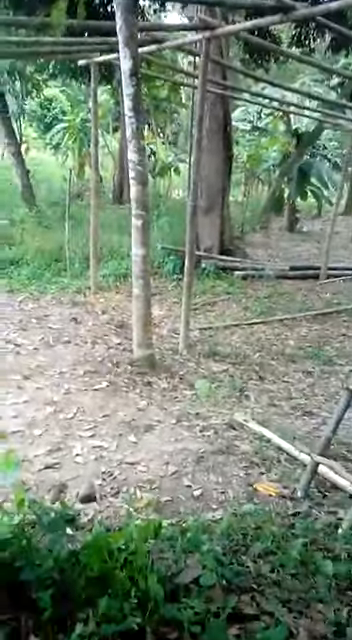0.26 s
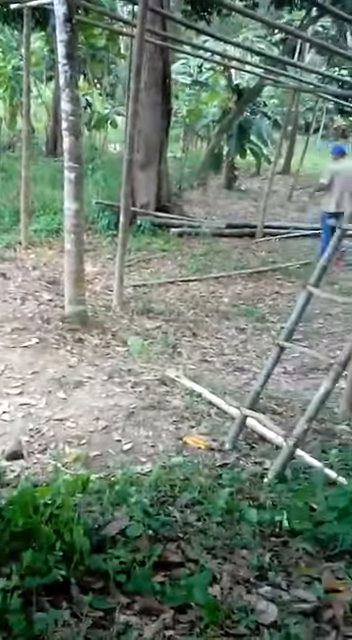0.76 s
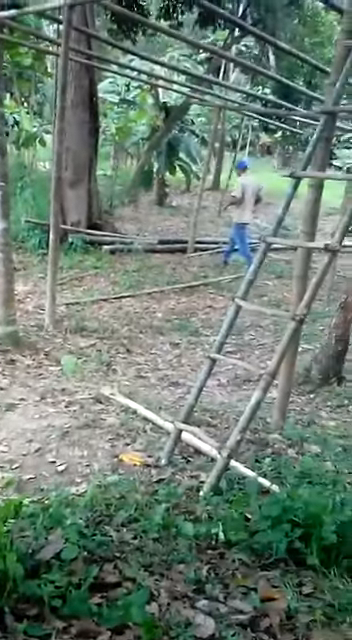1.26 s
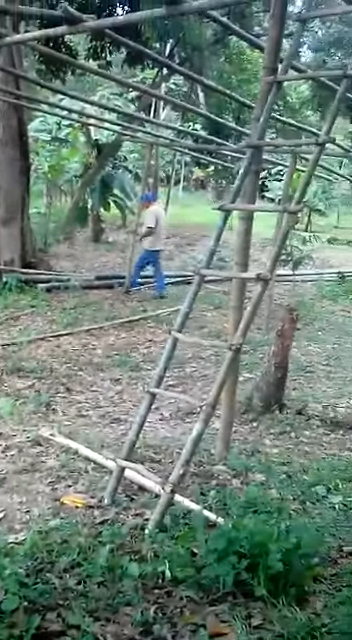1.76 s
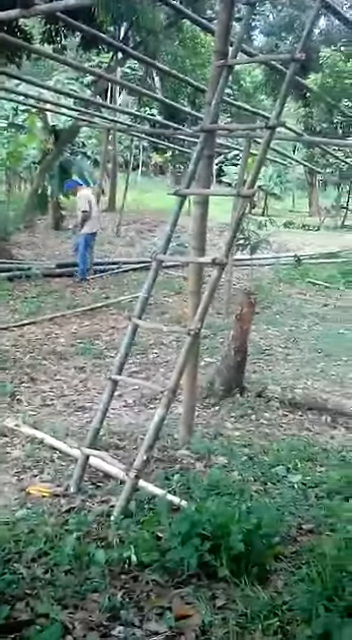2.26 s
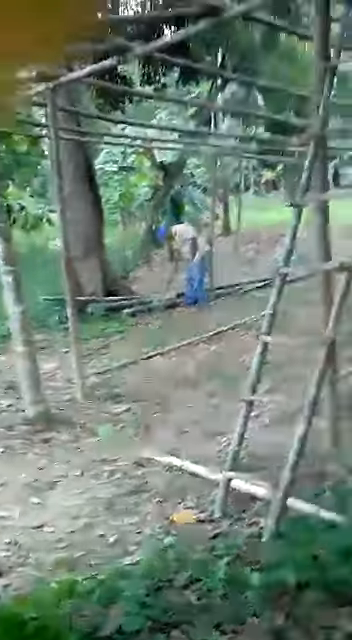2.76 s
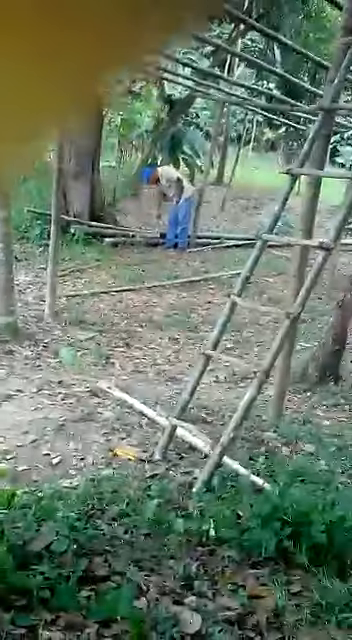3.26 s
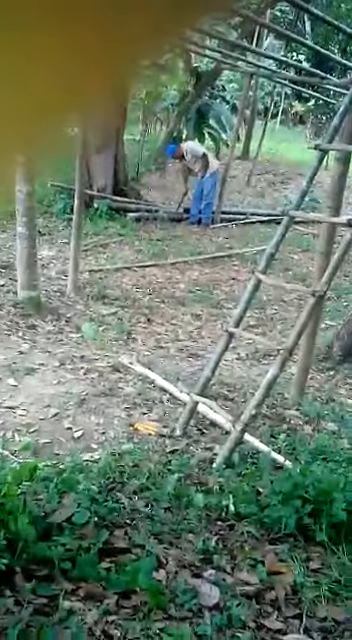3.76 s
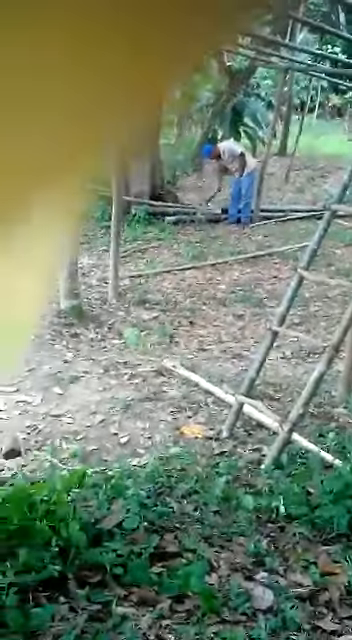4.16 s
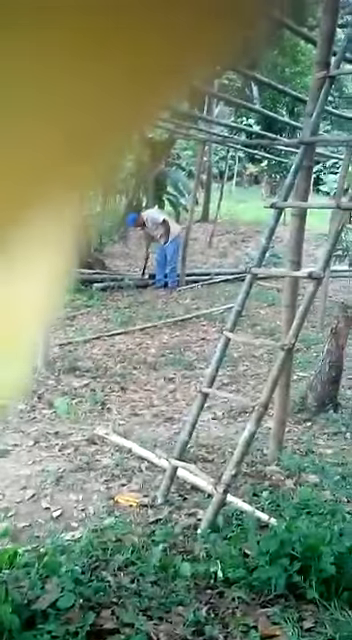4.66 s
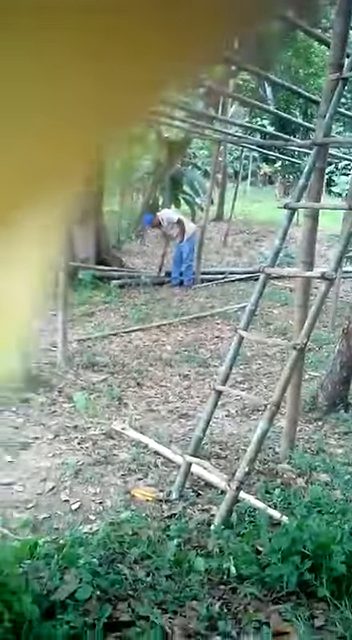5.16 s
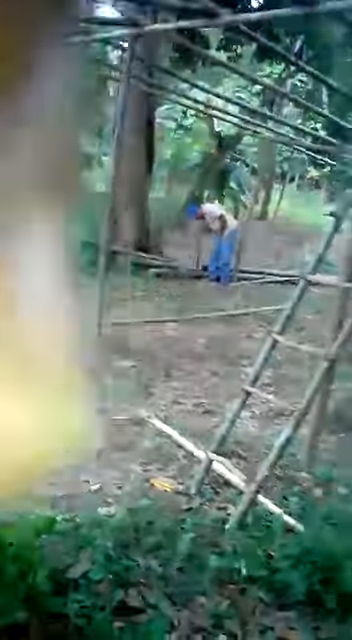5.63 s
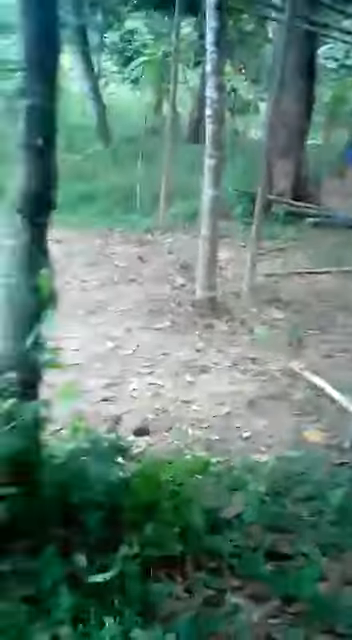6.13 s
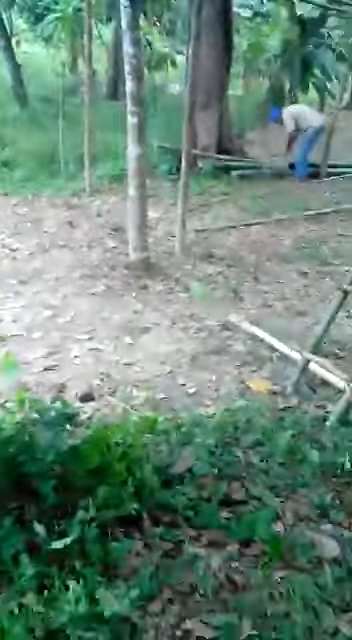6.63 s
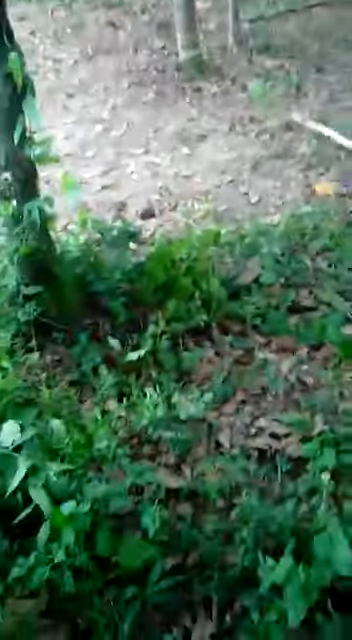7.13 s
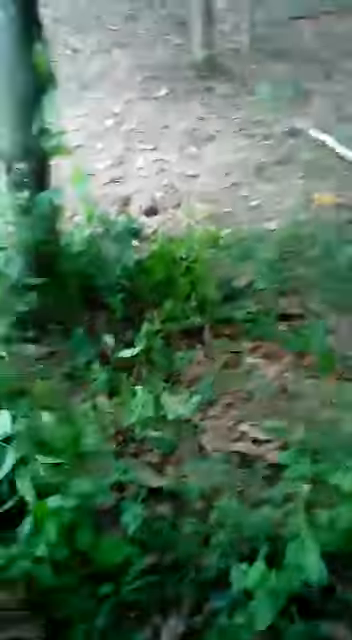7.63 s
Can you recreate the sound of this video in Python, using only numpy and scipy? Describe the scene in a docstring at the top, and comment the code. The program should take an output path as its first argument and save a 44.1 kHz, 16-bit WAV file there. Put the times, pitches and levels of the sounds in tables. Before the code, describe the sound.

A quiet outdoor grove with faint rustle and thin sliding insect-like hisses. Fingers knock and rub the phone case right at the microphone, mostly left, in a cluster near three seconds, then loudly and busily from five and a half seconds to the end. Between them a blade chops hollow poles some way off, dry twigs snap sharply nearby, and small birds chirp and sing.

```python
"""Hands on a phone in a grove

Fingers tap, slip and rub on the case of a hand-held phone, mostly at the left microphone: damped modes and
grainy noise. Twigs and dry leaves snap nearby as short modal bursts; a blade chops hollow poles further off,
as decaying bands of noise with a falling ring. Small birds chirp in the trees as gliding sines, over a quiet
floor of rustle in noise bands and narrow hisses that slide in pitch, perhaps far insects."""
import sys
import numpy as np
from scipy import signal
from scipy.fft import rfft, irfft
from scipy.io import wavfile
from scipy.ndimage import uniform_filter1d

SR = 44100
rng = np.random.default_rng(int(sys.argv[2]) if len(sys.argv) > 2 else 0)


def dump_mix(stems):
    """Bounce the given channels to the path in sys.argv[1] as a 16-bit WAV at rate SR."""
    frames = np.atleast_2d(stems).T  # one column per channel
    limited = np.clip(frames, -1, 1)  # hard clip at full scale
    pcm = np.round(limited * 32767).astype(np.int16)
    wavfile.write(sys.argv[1], SR, pcm)


N = 347949      # length in samples


def amp(db):
    """Decibel law: the amplitude gain of a level in dB."""
    return 10 ** (np.asarray(db) / 20)


def rms_one(x):
    """Normalisation: scales a signal to rms 1."""
    return x / np.sqrt(np.mean(x ** 2) + 1e-20)


def at_hz(points, hz):
    """Interpolation on a logarithmic frequency axis."""
    table = np.array(points)
    return np.interp(np.log(hz), np.log(table[:, 0]), table[:, 1])


def spectrum_hz():
    """Discrete spectrum: the bin frequencies of the whole scene, held above 10 Hz for the logarithm."""
    return np.maximum(np.arange(N // 2 + 1) * SR / N, 10)


def pan(left_right_db):
    """Level difference between channels: positive is left, and the nearer side keeps its level."""
    return amp(np.array([np.minimum(left_right_db, 0), np.minimum(-left_right_db, 0)]))


def drift(corner_hz):
    """Low-pass random process: noise through two equal poles, scaled to a spread of 1."""
    step = 20      # samples between computed points
    pole = np.exp(-2 * np.pi * corner_hz * step / SR)
    noise = rng.standard_normal(N // step + 2002)
    slow = signal.lfilter([1], [1, -2 * pole, pole * pole], noise)[2000:]      # skip the settling
    return np.interp(np.arange(N) / step, np.arange(len(slow)), rms_one(slow))


def coloured(x, spectrum):
    """Spectral shaping: weights the spectrum of a noise by a table."""
    return rms_one(irfft(rfft(x) * amp(at_hz(spectrum, spectrum_hz())), N))


def decay(t, t60):
    """Exponential decay: the envelope falls 60 dB in t60 seconds."""
    return amp(-60 * t / t60)


def damped(t, hz, t60):
    """Damped resonance: one mode struck at time zero."""
    return np.sin(2 * np.pi * hz * t) * decay(t, t60)


def swept(hz):
    """Phase accumulation: a sine that follows a frequency curve."""
    return np.sin(2 * np.pi * np.cumsum(hz) / SR)


def add(out, s, sound):
    """Superposition: mixes a sound in at a time."""
    i = round(s * SR)
    out[..., i:i + sound.shape[-1]] += sound[..., :N - i]


def trees(x, wet_db):
    """Scattering by trunks and leaves: convolution with a separate noise tail in each channel."""
    t = np.arange(SR) / SR
    tail = rng.standard_normal((2, SR)) * decay(t, .42) * (1 - np.exp(-t / 0.018))
    tail = rms_one(tail) / np.sqrt(SR)      # unit energy
    return amp(wet_db) * signal.fftconvolve(x[None], tail, axes=1)[:, :N]


# Spectrum of the rustle. Each row: frequency in Hz, left and right relative levels in dB per Hz.
GROVE_SPECTRUM = [(25, -87, -93.5), (54.6, -75.5, -84), (97.8, -85.5, -77.5), (203.4, -89, -84),
                  (431, -95, -88.5), (900, -96, -90.5), (1980, -99.1, -97.5), (2920, -99, -103.5),
                  (3630, -95.5, -100.2), (4400, -96.5, -103.6), (5300, -99.4, -107.6), (6600, -98, -101.6),
                  (7700, -101.7, -113.6), (8860, -116.8, -130.9)]
# Correlation of the channels. Each row: frequency in Hz, left-right likeness from -1 to 1.
LIKENESS = [(60, 1), (210, 0.6), (700, 0.47), (2400, 0.11), (8190, -0.45)]
# Leaves stirred in the air. Each row: start in seconds, length in seconds, peak treble level in dB over the rustle.
SWISHES = [(0.733, .14, 15), (1.709, 0.054, 3), (2.1, 0.12, 5), (2.334, 0.047, 4), (2.693, 0.067, 8)]
GROVE_DB = -55      # rms over both channels


def grove():
    """Partly correlated noise: half-octave bands, each with its own left-right likeness and flicker."""
    swish_db = np.zeros(N)
    for s, length, over_db in SWISHES:
        add(swish_db, s, over_db * np.hanning(round(length * SR)))
    out = np.zeros((2, N))
    together = drift(0.9)
    white = rng.standard_normal((2, 2, N))      # neighbouring bands use different noises
    edges = 15 * 2 ** (np.arange(20) / 2)
    for k, (low, high) in enumerate(zip(edges, edges[1:])):
        band = signal.butter(2, [low, high], "band", fs=SR, output="sos")
        mid, side = signal.sosfilt(band, white[k % 2])
        alike = np.clip(at_hz(LIKENESS, np.sqrt(low * high)), -1, 1)
        stereo = np.sqrt(1 + alike) * mid + np.sqrt(1 - alike) * side * [[1], [-1]]
        treble = np.clip(np.log2(low / 900) / 2, 0, 1)      # leaves swish in the treble
        out += amp(.5 * together + 2.1 * drift(4.9) + treble * swish_db) * stereo
    # each microphone has its own colour
    colour = [at_hz(np.array(GROVE_SPECTRUM)[:, [0, side]], spectrum_hz()) for side in (1, 2)]
    return amp(GROVE_DB) * rms_one(irfft(rfft(out) * amp(colour), N))


# Sliding hisses, perhaps far insects. Each row: start in seconds, length in seconds, start frequency in Hz,
# end frequency in Hz, nominal bandwidth in Hz, relative level in dB.
SLIDES = [(0, 0.31, 4140, 4120, 687, -60), (1.13, 0.23, 5280, 3900, 700, -58),
          (1.402, .4, 4000, 3890, 897, -60.5), (1.754, 0.16, 4730, 5360, 1410, -57),
          (2.031, 0.41, 7460, 4550, 594, -53.5), (2.268, .2, 7000, 6260, 815, -56),
          (2.541, .12, 4600, 5600, 900, -48.5), (2.95, 0.98, 6400, 6450, 249, -59),
          (3.8, .85, 6600, 6110, 253.5, -59), (4.77, 0.27, 5200, 3740, 449, -48.5),
          (5.06, 0.24, 6300, 6200, 252, -59.5), (5.79, 0.35, 6700, 4440, 503, -53.5)]
SLIDE_EDGE, SLIDE_PAN_DB = 0.32, 12.5      # share of the length spent fading; left over right


def sliding_hiss():
    """Amplitude modulation: slow noise on a gliding carrier makes a moving band, heard in patches."""
    out = np.zeros((2, N))
    for s, length, start_hz, end_hz, width_hz, level_db in SLIDES:
        hz = np.geomspace(start_hz, end_hz, round(length * SR))
        clock = np.arange(len(hz)) * 2 * width_hz / SR      # a wider band flickers faster
        points = rng.standard_normal((2, 2000))
        noise = np.array([np.interp(clock, np.arange(len(side)), side) for side in points])
        fade = signal.windows.tukey(len(hz), SLIDE_EDGE)
        add(out, s, amp(level_db) * fade * noise * swept(hz))
    patches = amp(2.5 * drift(14))
    return patches * out * pan(np.array([SLIDE_PAN_DB]))


# Single notes, mostly rising. Each row: start in seconds, length in seconds, start frequency in Hz,
# end frequency in Hz, relative level in dB.
SINGLE_NOTES = [(1.02, 0.029, 1170, 1145, -55), (1.125, .027, 3270, 2830, -58.5),
                (3.1, 0.14, 7100, 6500, -54), (3.15, 0.026, 6450, 6370, -54),
                (4.95, 0.037, 6900, 5900, -52), (6.235, 0.016, 3390, 4250, -42),
                (6.605, .02, 3380, 4300, -54), (6.675, 0.018, 3400, 4120, -49),
                (6.94, 0.04, 3470, 3750, -52), (6.97, 0.032, 3770, 4400, -51.5),
                (7.35, 0.033, 3580, 5070, -60), (7.37, 0.02, 3700, 3500, -55),
                (7.422, 0.028, 3500, 5350, -48), (7.61, .015, 3180, 4260, -58),
                (7.65, 0.033, 3370, 3900, -53), (7.695, 0.021, 3360, 4600, -53),
                (7.87, 0.029, 3460, 3800, -46)]
# One quick falling note of the trill. Each row: as for single notes, with the start counted from the call.
TRILL_NOTE = [(0, .015, 4080, 3480, -54)]
TRILL_S, TRILL_GAP_S = 4.83, .071
# A chip and a falling tail. Each row: as for the trill, with the level in dB over the call.
PHRASE = [(0, .024, 3444, 3613, 2.5), (.04, .036, 3130, 2310, -6)]
# Repeats of the phrase. Each row: frequency ratio, relative level in dB.
SONG = [(1.06, -48), (.99, -50.5), (1, -47), (1.001, -47.5), (1.001, -45), (1.03, -45.5)]
SONG_S, PHRASE_GAP_S = 5.033, .1465      # start of the song, time between phrase starts
# Another bird's call: up, down, up. Each row: as for the phrase.
ZIGZAG = [(0, 0.022, 4750, 5700, -4.8), (.028, .016, 5690, 4630, -1), (.046, .02, 5300, 6460, 0.5)]
# Its calls. Each row: start in seconds, frequency ratio, relative level in dB.
ZIGZAG_CALLS = [(3.53, 0.96, -47), (4.235, 0.95, -46), (6.468, 1.001, -42.5), (7.149, 1.1, -49)]


def bird_notes():
    """Transposition of patterns: a trill of three notes opens a song of phrases, and another bird zigzags."""
    calls = [(TRILL_NOTE, TRILL_S + k * TRILL_GAP_S, 1, 0) for k in range(3)]
    calls += [(PHRASE, SONG_S + k * PHRASE_GAP_S, ratio, db) for k, (ratio, db) in enumerate(SONG)]
    calls += [(ZIGZAG, s, ratio, db) for s, ratio, db in ZIGZAG_CALLS]
    notes = list(SINGLE_NOTES)
    for call, s, ratio, db in calls:
        for lag, length, start_hz, end_hz, note_db in call:
            notes.append((s + lag, length, ratio * start_hz, ratio * end_hz, db + note_db))
    return notes


def birds():
    """Frequency modulation: gliding whistles with soft ends, scattered among the trees."""
    out = np.zeros(N)
    for s, length, start_hz, end_hz, level_db in bird_notes():
        hz = np.geomspace(start_hz, end_hz, max(round(length * SR), 8))
        hz = hz + 375 * uniform_filter1d(rng.standard_normal(len(hz)), size=60)      # the pitch trembles
        soft = np.sqrt(np.hanning(len(hz)))
        add(out, s, amp(level_db) * soft * swept(hz))
    out = out * amp(3.5 * drift(80) + 2.5 * drift(300) - 4)      # moving leaves break the whistles up
    return out * pan(np.array([2.5])) + trees(out, wet_db=-6)


# Blows on the poles. Each row: time in seconds, relative level in dB, then crack (above 1600 Hz),
# body (above 800 Hz) and bass in dB over it.
CHOPS = [(3.351, -33.5, -10.5, -0.5, 0.5), (3.503, -45.5, -4, -2.5, -5), (4.005, -33.5, -3, 2, 4.5),
         (4.717, -30.5, 0.5, 3.5, -5.5)]
# Bending waves in the pole. Each row: frequency in Hz, bandwidth in Hz, relative level in dB,
# rise time constant in seconds, 60 dB decay time in seconds.
POLE_MODES = [(196, 64, 1, 0.0053, 0.21), (408, 140, -6, 0.0033, 0.089), (637, 130, 0.5, 0.0024, 0.28),
              (1120, 72, -11.5, 0.0019, 0.046), (1360, 250, 4, 0.0028, 0.046),
              (1950, 260, 5, 0.00057, 0.038), (3130, 1700, 5.5, 0.00064, 0.067),
              (4250, 550, 9.5, 0.0026, 0.026), (6500, 1800, 6, 0.0013, 0.028)]
GLIDE_HZ = 1492      # start of the falling ring


def chops():
    """Dispersive bending waves: splintering noise fills broad modes, and a rough ring bends downward."""
    out, t = np.zeros(N), np.arange(round(.3 * SR)) / SR
    for peak_s, level_db, crack_db, body_db, bass_db in CHOPS:
        s = peak_s - .0015      # the blade bites just before the peak
        for hz, width_hz, mode_db, rise, t60 in POLE_MODES:
            mode = rms_one(signal.lfilter(*signal.iirpeak(hz, hz / width_hz, SR), rng.standard_normal(len(t))))
            shape = (1 - np.exp(-t / rise)) ** 2 * decay(t, t60)
            part_db = crack_db if hz > 1600 else body_db if hz > 800 else bass_db
            add(out, s, amp(level_db - 5 + mode_db + part_db) * shape * mode)
        falling_hz = GLIDE_HZ / np.sqrt(1 + t / .022)      # slower, lower waves come last
        rough = 1 + 0.38 * rms_one(uniform_filter1d(rng.standard_normal(len(t)), size=120))
        ring = rough * swept(falling_hz) * (1 - np.exp(-t / 0.0013)) * decay(t, 0.11)
        add(out, s, amp(level_db - 3.5 + body_db) * ring)
    add(out, .032, amp(-14) * uniform_filter1d(out, size=16))      # a dull echo off the nearby trunks
    bright_tail = trees(np.diff(out, prepend=0), wet_db=-2.5)      # differencing favours the treble
    return out * pan(np.array([-1.5])) + bright_tail + trees(out, wet_db=-18.5)


# Dry twigs and leaves, with their rebounds. Each row: time in seconds, relative level in dB,
# left-right difference in dB, main mode in Hz.
SNAPS = [(0.2562, -28.5, 7, 3360), (0.2637, -37, -5, 3340), (0.288, -37, -4, 3200), (3.7154, -20, 11, 4000),
         (3.721, -23, -35, 3770), (3.7276, -26, -22, 3840), (3.7469, -26, 8, 3550),
         (5.3162, -15.5, 21, 3900), (5.3214, -20, -17, 3820), (5.326, -24.5, 18, 3750)]


def snaps():
    """Modal synthesis: millisecond bursts ring in three heavily damped modes."""
    out, t = np.zeros((2, N)), np.arange(round(.02 * SR)) / SR
    for s, level_db, pan_db, hz in SNAPS:
        a, b = rng.uniform(.92, 1.08, 2)      # the outer modes vary from snap to snap
        modes = damped(t, hz, 0.0033)
        modes += 0.73 * damped(t, 1.39 * hz * a, 0.004)
        modes += 0.56 * damped(t, 0.51 * hz * b, 0.0032)
        burst = modes * (1 - np.exp(-t / 0.00014))
        add(out, s - .0003, amp(level_db) * burst * pan(np.array([pan_db])))
    return out + trees(out.mean(0), wet_db=-17)


# Strokes of skin on the case. Each row: start in seconds, length in seconds, relative levels in dB of
# the bright part at the start, the bright part at the end and the dull part.
STROKES = [(2.464, 0.035, -37.5, -33, -51), (2.65, 0.044, -42.5, -53.5, -47), (2.726, .17, -45, -58.5, -52),
           (2.908, 0.098, -50.5, -52, -47.5), (3.016, 0.28, -55.5, -60.5, -50.5),
           (3.378, 0.19, -75, -56, -52.5), (4.142, .22, -62.5, -52, -53.5), (5.6, 0.13, -43, -49.5, -44),
           (5.799, 0.16, -49.5, -53.5, -56), (5.996, 0.19, -52, -41.5, -53.5), (6.219, 0.14, -40, -44, -46),
           (6.366, 0.091, -42, -36, -52), (6.487, 0.064, -54, -39, -53), (6.558, 0.091, -38, -36.5, -43.5),
           (6.695, 0.087, -54.5, -32, -43), (6.774, 0.095, -25, -48.5, -48), (6.905, 0.21, -46, -59, -54.5),
           (7.13, 0.16, -54.5, -53.5, -52), (7.302, .11, -48.5, -50.5, -47),
           (7.408, 0.063, -46.5, -40, -43.5), (7.473, 0.228, -50.5, -55, -51.5),
           (7.716, 0.067, -46, -48, -46), (7.755, .05, -37, -39, -49.5), (7.815, .092, -39, -38, -53.5)]
# Spectrum of the bright rub. Each row: frequency in Hz, relative level in dB per Hz.
BRIGHT_SPECTRUM = [(530, -11), (900, -5.5), (1100, -9.5), (2220, -1.5), (3930, -3), (4750, -9.5),
                   (7110, -13), (8500, -3.5), (11000, -69), (18700, -120)]
# Spectrum of the dull rub. Each row: frequency in Hz, relative level in dB per Hz.
DULL_SPECTRUM = [(29, -46), (50, 9.5), (282, -2), (350, -1), (628, -2), (1170, -6.5), (2000, -16),
                 (2600, -55.5), (4400, -120)]
# Side of the hand's dull rub. Each row: time in seconds, left-right difference in dB.
GRIP = [(2.4, -6), (2.9, 4), (3.1, -2), (3.5, -11), (5.65, -4.5), (5.85, 3), (6.5, 8.5), (6.75, 16),
        (7.0, 11.5), (7.89, 1.5)]
# the nearer a stroke runs to the left port, the louder and the more to the left its bright part
CENTRED_DB, LEFT_PER_DB = -73.5, 0.7
# harder strokes hiss more above this frequency: extra dB for each dB of level over the even point
HISS_HZ, HISS_EVEN_DB, HISS_GROWTH = 4800, -40.5, 0.16


def rub():
    """Stick-slip friction: dense slips of skin make a bright and a dull grainy noise, opened by each stroke."""
    bright_gain, dull_gain = np.zeros((2, 2, N))
    for s, length, start_db, end_db, dull_db in STROKES:
        edge = signal.windows.tukey(round(length * SR), min(0.013 / length, 1))
        bright_db = np.linspace(start_db, end_db, len(edge))
        side = pan(LEFT_PER_DB * (bright_db - CENTRED_DB))
        add(bright_gain, s, edge * amp(bright_db) * side)
        add(dull_gain, s, edge * amp(dull_db))
    grip_s, grip_db = np.transpose(GRIP)
    dull_side = pan(np.interp(np.arange(N) / SR, grip_s, grip_db))
    gains = np.array([bright_gain, dull_gain * dull_side])
    # contact opens with the stroke and fades with a time constant of about 11 ms
    skin = np.maximum(gains, signal.lfilter([.002], [1, -.998], gains))

    crackle = 1 + 2.2 * rng.exponential(1, N) * (rng.random(N) < 700 / SR)      # single slips stand out
    grain = amp(2.2 * drift(200) + 1.3 * drift(25))
    bright = coloured(crackle * grain * rng.standard_normal((2, N)), BRIGHT_SPECTRUM)
    lumps = amp(3.3 * drift(58))
    shared_and_own = rng.standard_normal(N) + 1.4 * rng.standard_normal((2, N))
    dull = coloured(lumps * shared_and_own, DULL_SPECTRUM)

    hiss = signal.sosfiltfilt(signal.butter(4, HISS_HZ, "high", fs=SR, output="sos"), bright)
    hiss_gain = (skin[0].max(0) / amp(HISS_EVEN_DB)) ** HISS_GROWTH
    bright = bright + hiss * (hiss_gain - 1)
    return skin[0] * bright + skin[1] * dull


# Taps on the case. Each row: time in seconds, relative ring level in dB, left-right difference in dB,
# ring frequency in Hz, relative tick level in dB, relative thump level in dB.
TAPS = [(0.508, -12.5, 43, 680, -28, -56), (0.6159, -28, 34, 630, -52, -36),
        (2.473, -9.5, 43, 805, -16.5, -54), (2.6352, 0, 47, 1940, -54, -61),
        (2.6694, -20, 20, 1150, -32, -72), (2.7725, -0.5, 10, 786, -4.5, -19),
        (2.9201, -15, 42, 800, -26, -63), (2.97, -17.5, 24, 1220, -56, -57),
        (2.997, -44, -16, 450, -48, -34), (3.049, -23, 10, 1480, -53, -36),
        (3.1949, -23.5, 32, 526, -56, -56), (3.238, -22, -28, 530, -61, -32.5),
        (3.2683, -40, 3.5, 410, -35, -37), (4.2175, -39, 25, 1010, -31, -62),
        (4.2808, -46, 32, 1460, -27.5, -58), (4.3583, -30.5, 30, 577, -39, -64),
        (5.4987, -20, 38, 730, -28, -64), (5.51, -17, 32, 1190, -61, -58),
        (5.57, -30, -19, 594, -38.5, -38), (5.607, -10, -29, 606, -38, -44),
        (5.611, -25, 25, 700, -15, -26), (5.6105, 9, -22, 596, -23, -14.5),
        (5.631, -15, 5, 910, -21.5, -31.5), (5.719, -16, -35, 420, -23.5, -23),
        (5.8064, -10, 12.5, 1240, -26.5, -34.5), (6.2416, -18, 22, 760, -38, -64),
        (6.2566, -12, 26, 990, -19, -46), (6.5814, -20, 20, 875, -39, -26),
        (6.6988, -27, 26, 440, -22.5, -43), (6.7458, -24, 17, 1500, -26, -30),
        (6.773, 3.5, 29, 720, -10, -23.5), (6.7797, 2.6, 22, 690, -0.1, -11.5),
        (6.8961, -29.5, 3, 690, -37, -60), (6.9152, -47, 23, 640, -49, -33.5),
        (7.199, -23, 28, 1860, -26, -64), (7.2082, -13.5, 21, 1900, -35, -48),
        (7.3147, -17.5, 15, 870, -20.5, -24.5), (7.4432, -34, 11, 410, -27, -31.5),
        (7.4947, -7.5, 49, 957, -14, -62), (7.5268, -13.5, 18, 1290, -21.5, -31),
        (7.6237, -46, 17, 860, -47, -41), (7.72, -45, 23, 620, -31, -58),
        (7.7573, -33, 22, 834, -13.5, -69), (7.7712, -30, 37, 900, -16, -54),
        (7.787, -25, 24, 1890, -15, -58)]
CONTACT_S = 0.00016      # the fingertip is soft: onset time constant of the ring
RING_CYCLES = 2.88      # cycles of the ring in its 60 dB decay
AFTER_RING_DB, AFTER_RING_CYCLES = -20.5, 15.4      # a weaker ring outlasts the first swing
GRIT_DB = 5.5      # grit over the tick, before smoothing
# the thump starts higher and sags; both frequencies vary by up to 12 % from tap to tap
THUMP_START_HZ, THUMP_HZ, THUMP_SAG_S, THUMP_T60_S = 400, 102, 0.0013, 0.039


def taps():
    """Impact excitation: the case rings, ticks at the port and thumps; the far side hears it duller and later."""
    out, t = np.zeros((2, N)), np.arange(round(.08 * SR)) / SR
    sag_hz = THUMP_HZ + (THUMP_START_HZ - THUMP_HZ) * np.exp(-t / THUMP_SAG_S)
    for s, ring_db, pan_db, hz, tick_db, thump_db in TAPS:
        a, b = rng.uniform(.88, 1.12, 2)      # modes vary from tap to tap
        first_swing = damped(t, hz, RING_CYCLES / hz)
        after_ring = amp(AFTER_RING_DB) * damped(t, hz * a, AFTER_RING_CYCLES / hz)
        ring = amp(ring_db) * (first_swing + after_ring) * (1 - np.exp(-t / CONTACT_S))

        modes = damped(t, 3300 * a, .0035) + .25 * damped(t, 5800 * b, .003) + .6 * damped(t, 1600 * b, .005)
        grit = uniform_filter1d(rng.standard_normal(len(t)), size=5) * decay(t, 0.004)      # under the finger
        tick = amp(tick_db) * (modes + amp(GRIT_DB) * grit)

        thump = -amp(thump_db) * swept(sag_hz * b) * decay(t, THUMP_T60_S)

        near = ring + tick + thump
        far = amp(-abs(pan_db)) * (ring + amp(-9.5) * tick + amp(10.5) * thump)
        add(out[int(pan_db < 0)], s - .0002, near)
        add(out[int(pan_db >= 0)], s + .0001, far)
    return out


def scene():
    """Superposition: all sources add at the two microphones."""
    return grove() + sliding_hiss() + birds() + chops() + snaps() + rub() + taps()


PORT_CUT_HZ, CUTOFF_HZ = 95.5, 9200      # bass cut of the ports, edge of the steep top cut
MIC_ROLLOFF_HZ = (7770, 6600)      # left, right


def record(dry):
    """Band limiting and overload: ports cut the bass, treble rolls off, the loudest peaks clip, the top is cut."""
    port = signal.sosfilt(signal.butter(2, PORT_CUT_HZ, "high", fs=SR, output="sos"), dry)
    soft = [signal.sosfilt(signal.butter(4, hz, fs=SR, output="sos"), x) for hz, x in zip(MIC_ROLLOFF_HZ, port)]
    clipped = np.clip(soft, -.85, .85)
    cut = signal.sosfilt(signal.cheby2(12, 70, CUTOFF_HZ, fs=SR, output="sos"), clipped)
    noise_floor = amp(-104) * rng.standard_normal(dry.shape)
    return np.clip(cut + noise_floor, -1, 1)


dry = scene()
out = record(dry)
dump_mix(out)
```